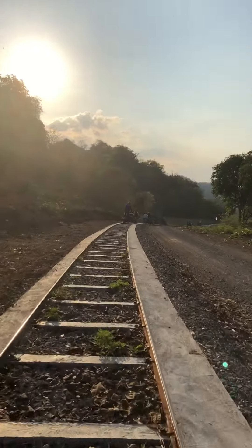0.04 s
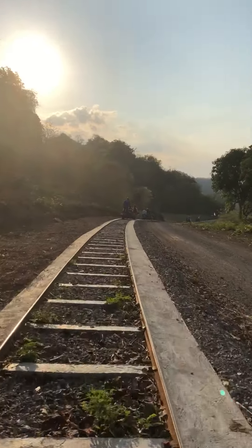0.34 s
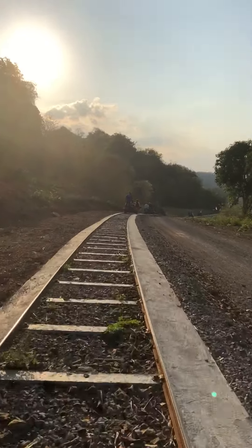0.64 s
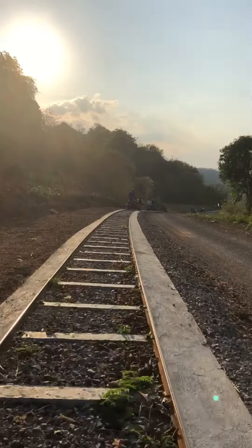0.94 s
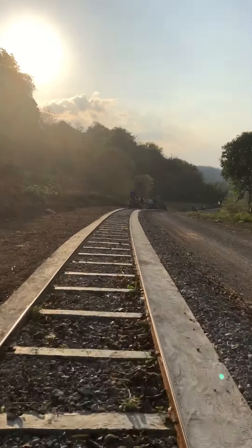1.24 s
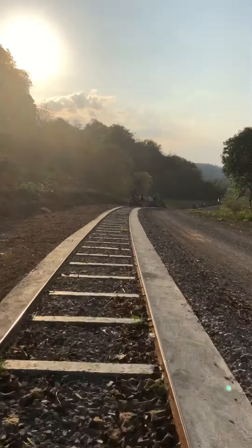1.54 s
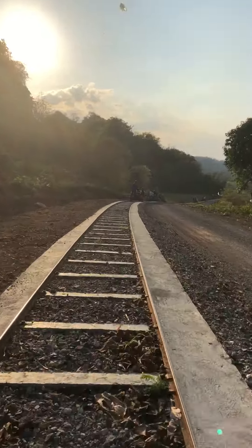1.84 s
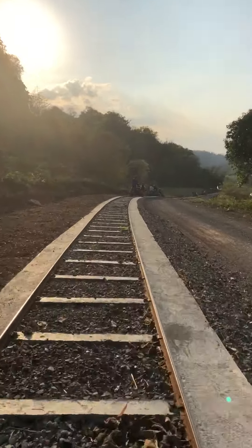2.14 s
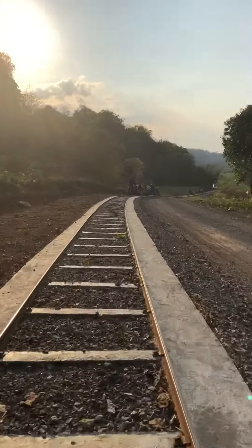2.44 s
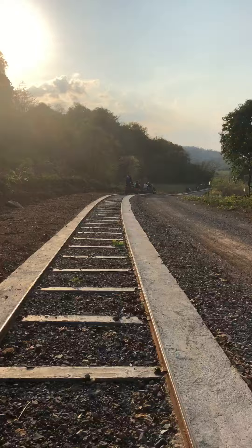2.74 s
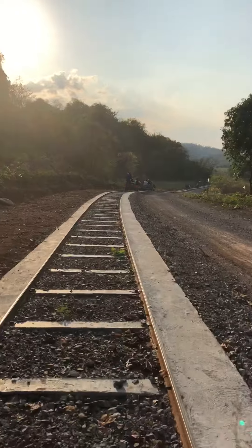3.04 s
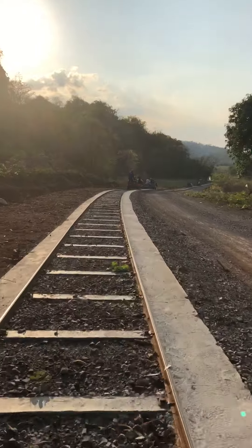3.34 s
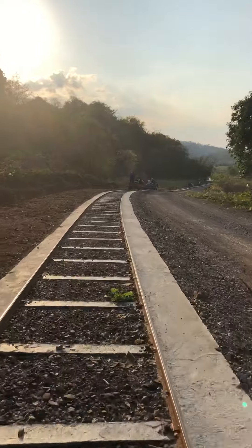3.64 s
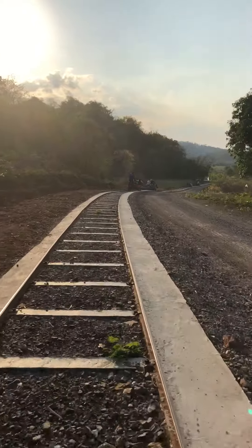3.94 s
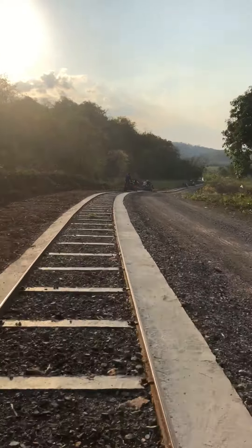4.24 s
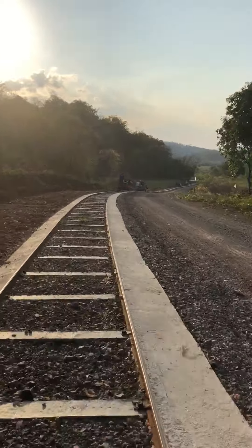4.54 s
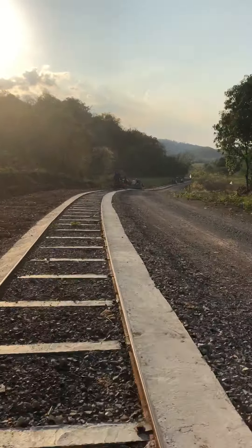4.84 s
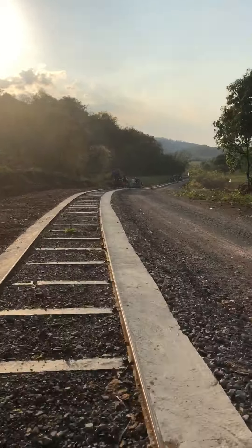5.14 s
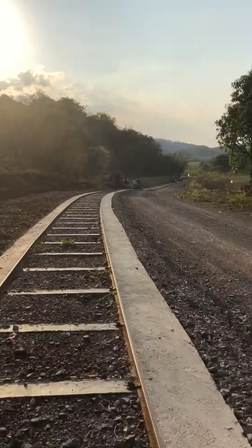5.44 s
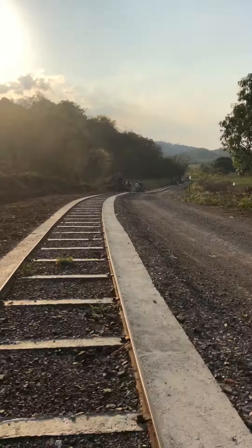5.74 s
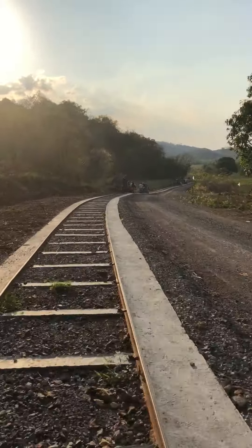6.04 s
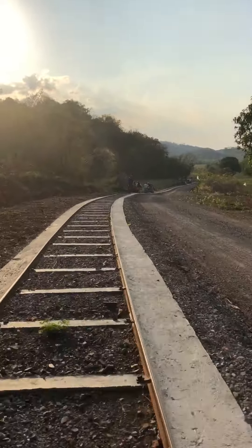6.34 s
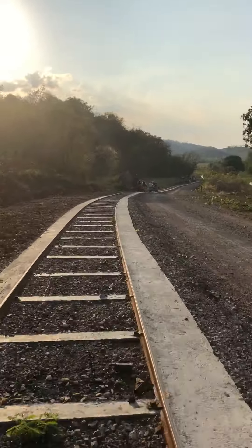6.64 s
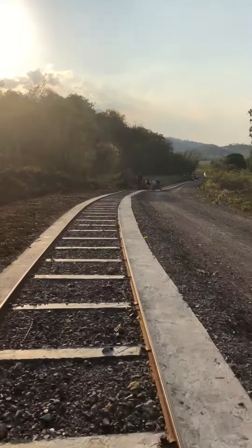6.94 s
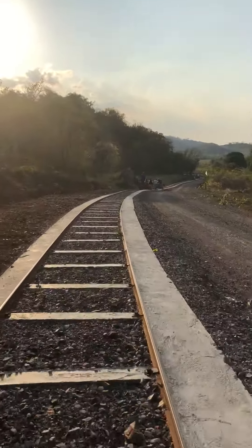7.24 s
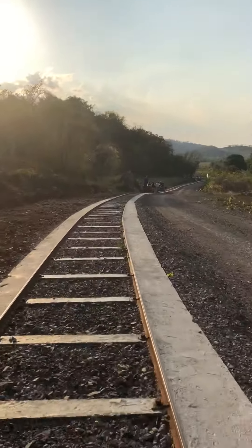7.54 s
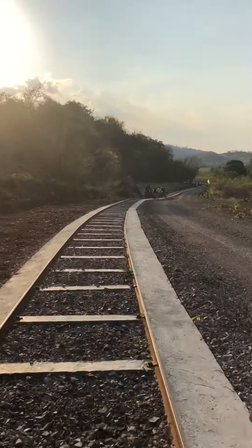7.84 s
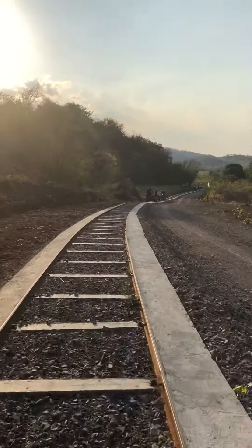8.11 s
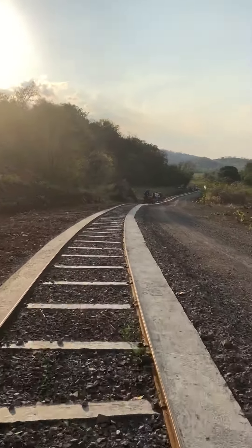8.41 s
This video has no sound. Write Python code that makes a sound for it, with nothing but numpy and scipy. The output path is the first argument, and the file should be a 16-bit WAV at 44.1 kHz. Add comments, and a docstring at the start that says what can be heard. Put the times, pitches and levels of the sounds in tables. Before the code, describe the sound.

A small motor trolley rolls along a curving narrow track in the open, heard from on board with no echo. A loud, deep deck rumble and frame rattle run from start to end, with a slow engine throbbing softly underneath. Bumps in the rail add low thumps and knocks at about 1 second, around 2.5, from 3.7 to 4.1, strongly at 5.7, and in a cluster from 6.4 to 7.3 seconds. Much quieter, a wheel scrapes the rail with a high metallic ring four to five times a second, with stray touches and sharper sizzling bites near 0.8, 4.1, 5.2 and 8.5 seconds. The wheels hiss over sand in the background, crunching briefly at each bump. A faint, thin steel whine comes and goes, and a slight hollow ring swells in the frame near 7.7 seconds.

```python
"""A loud, thumping deck rumble, heard on board a small motor trolley on an open narrow-gauge curve.
Rough rail shakes the deck and rattles the frame; bumps heave the deck, and a slow engine throbs below.
A wheel flange scrapes the rail once a turn, with stray touches and hard bites in between.
Behind it the treads hiss over sand, and now and then the steel sings with a thin whine."""
import sys
import numpy as np
from scipy import signal
from scipy.fft import rfft, irfft, next_fast_len
from scipy.io import wavfile
from scipy.ndimage import uniform_filter1d

SR = 44100
rng = np.random.default_rng(int(sys.argv[2]) if len(sys.argv) > 2 else 0)


def master_out(mix):
    """Clip the mix to full scale and print it as 16-bit PCM to the path in sys.argv[1]."""
    frames = np.transpose(np.atleast_2d(mix))
    ceiling = np.clip(frames, -1, 1)
    pcm = np.round(ceiling * 32767).astype(np.int16)
    wavfile.write(sys.argv[1], SR, pcm)


N = 377937
TIME = np.arange(N) / SR

# Resonances of deck, frame and wheel: f/Hz, nominal width/Hz, relative level/dB
BOOM_MODES = [(89, 28, -15.5), (122, 41.7, 1), (154.2, 35.7, -0.5)]
DRONE_MODES = [(234.9, 50.6, -2), (276.5, 64.2, -1), (333, 65, -10.5)]
FRAME_MODES = [(379.7, 69, -1.5), (488.4, 78.6, 0.5), (627, 124, -7), (856, 126, -8.5), (970, 73, -13.5)]
RING_MODES = [(3480, 42, 0), (3540, 45, -2.5), (4020, 65, -6)]
SIZZLE_MODES = [(9772, 70, -6), (9908, 75, -4.5), (10530, 170, -3), (10670, 120, 0), (14560, 300, -17),
                (15150, 160, -16), (15380, 150, -16)]
WHINE_MODES = [(8001, 45, 0), (8746, 80, -7), (13200, 350, -17)]
# Deck faders, before trim: t/s, boom level/dB, drone level/dB
DECK_LEVELS = [(0.1, -20, -19.5), (0.4, -20, -18.5), (1.43, -19, -17), (2.32, -17.5, -19.5),
               (2.72, -19, -19.5), (3.44, -18.5, -18), (4.33, -22.5, -20), (4.59, -19.5, -16),
               (5.39, -22, -16.5), (5.6, -19, -17.5), (5.97, -20.5, -18.5), (6.53, -21.5, -17),
               (7.8, -18.5, -19.5), (8.5, -20, -18)]
# Rail roughness as faders, before trim: t/s, frame rattle level/dB, tread hiss level/dB
RAIL_ROUGHNESS = [(0.1, -26, -42), (0.87, -26, -43.5), (4.5, -26, -44.5), (4.85, -26, -43.5),
                  (5.67, -26.5, -43.5), (6.79, -23.5, -42.5), (8.31, -24, -43.5), (8.5, -22.5, -42.5)]
# Big bumps in the rail: t/s, thump peak level/dB, thump f/Hz, knock drive level/dB
BIG_BUMPS = [(0.857, -7, 104, -26), (1.004, -5, 131, -24), (2.404, -1, 137, -28), (2.629, -5, 292, -15),
             (3.703, -4.5, 247, -19), (4.02, -5, 267, -25), (4.081, -3, 154, -14), (5.722, 0.5, 140, -17),
             (6.389, -5.5, 271, -16), (6.633, -5, 250, -12.5), (7.041, -5, 124, -18),
             (7.24, -4.5, 207, -20), (7.322, -2.5, 100, -7)]
# Engine speed: t/s, firing f/Hz
FIRING_RATE = [(0, 14.2), (.7, 14.2), (1.5, 14.03), (3.3, 14.1), (3.8, 14.35), (4.5, 14), (5.3, 13.95),
               (6, 14.15), (7.1, 13.8), (8.57, 14.15)]
# Engine partials: multiple of the firing rate, rms level/dB
ENGINE_ORDERS = [(3, -44), (4, -37), (5, -35.5), (6, -42), (7, -36.5), (8, -45.5), (9, -32.5), (10, -31),
                 (11, -45.5)]
# Swells of the frame's hollow ring: t/s, level/dB
HOLLOW_SWELLS = [(0, -46), (1.5, -42), (3.3, -49.5), (6.8, -47), (7.7, -36.5), (8.57, -40)]
# Wheel speed: t/s, turning f/Hz
WHEEL_SPEED = [(0, 4.284), (1.3, 4.595), (2.5, 4.593), (3.1, 4.158), (4.2, 4.423), (5.2, 4.447),
               (8.57, 4.739)]
# How the flange leans on the rail: t/s, ring level/dB, touch length/s
FLANGE_LEAN = [(0, -38.5, .04), (.3, -45.5, 0.052), (.7, -39, 0.088), (1, -46, 0.069), (1.8, -38.5, .05),
               (2.1, -42, .04), (2.65, -42, 0.055), (3, -50.5, 0.055), (3.6, -38, .022), (4.3, -44, .018),
               (4.55, -45.5, .04), (5, -43, 0.042), (5.43, -54.5, .03), (5.7, -40, 0.037),
               (6.15, -41, 0.058), (6.9, -56, .07), (7.2, -41.5, 0.054), (8.57, -41.5, 0.025)]
# Jolts throw the flange against the rail: t/s, length/s, ring level/dB, sizzle level/dB
FLANGE_BITES = [(0.797, 0.081, -37, -47), (1.023, 0.012, -37, -68), (1.157, 0.027, -43, -51),
                (1.216, .056, -41, -58), (1.405, 0.061, -43, -54), (1.803, 0.035, -53, -54.5),
                (3.424, 0.051, -48, -54.5), (4.078, 0.054, -43, -46.5), (4.304, .009, -56, -44.5),
                (5.206, 0.042, -42, -48.5), (5.74, .024, -39, -59), (6.47, 0.074, -54, -57),
                (6.76, 0.086, -44, -60), (8.48, 0.057, -43, -46.5)]
# Tone of the grit under the treads: f/Hz, relative level/dB
GRIT_EQ = [(500, 2), (1100, 0), (1500, -1.5), (2100, -5), (3200, -6.5), (4600, -15), (7200, -19.5),
           (9000, -26), (12000, -28.5), (15500, -33)]
# Swells of the wheel's whine: t/s, length/s, level/dB
WHINE_SWELLS = [(.05, 0.17, -65), (.21, .03, -51), (1.43, 0.067, -59), (5.58, 0.14, -59),
                (6.235, 0.082, -56), (7.2, 0.41, -69), (8.42, 0.067, -50)]


def rumble(boom_db, drone_db, frame_db, deck_trim_db=2.0, frame_trim_db=-1.68):
    """Rough rail drives the deck and the stiffer frame; rougher stretches make boom and rattle surge."""
    surge_db = .7 * drift(9)
    boom = from_db(boom_db + deck_trim_db + surge_db) * evened(shaken(BOOM_MODES, 1), span_s=.2)
    drone = from_db(drone_db + deck_trim_db) * evened(shaken(DRONE_MODES, 1), span_s=.25)
    flutter = from_db(1.95 * drift(60))
    rattle = evened(shaken(FRAME_MODES, flutter), span_s=.28)
    return boom + drone + from_db(frame_db + frame_trim_db + surge_db) * rattle


def thumps(bumps, width_hz=60, contact_hz=600):
    """Each bump heaves the deck for a few cycles and knocks the frame."""
    out, knocks = np.zeros(N), np.zeros(N)
    click = signal.unit_impulse(SR // 5)
    for s, peak_db, hz, knock_db in bumps:
        heave = resonate_twice(click, hz, width_hz)
        at = int(s * SR)
        out[at:at + len(click)] += (from_db(peak_db) * heave / np.abs(heave).max())[:N - at]
        knocks[at] = from_db(knock_db)
    # a heavy wheel lands softly, so the upper modes hardly speak
    knocks = signal.sosfilt(signal.butter(2, contact_hz, fs=SR, output="sos"), knocks + 1e-18)
    for k, (hz, mode_width_hz, mode_db) in enumerate(FRAME_MODES):
        ring_width_hz = mode_width_hz / 2
        strength = from_db(mode_db) * SR / (2 * np.pi * ring_width_hz)
        ring = resonate(knocks, hz, ring_width_hz)
        out += (-1) ** k * strength * resonate(ring, hz, width_hz=500)
    return out


def small_bumps(per_s=.8, peak_db=-12.5, knock_db=-25):
    """Light bumps at random times, pitched between boom and drone: rows as in BIG_BUMPS."""
    draws = rng.random((int(per_s * N / SR), 2))
    low_hz, high_hz = BOOM_MODES[1][0], DRONE_MODES[1][0]
    return [(when * TIME[-1], peak_db, low_hz * (high_hz / low_hz) ** pitch, knock_db)
            for when, pitch in draws]


def engine(first_firing_s=.00823, waver_db_per_order=.4715):
    """Low multiples of the firing rate add up to a soft throb; the higher ones waver more."""
    firings = cycles(FIRING_RATE, first_firing_s)
    throb = np.zeros(N)
    for order, level_db in ENGINE_ORDERS:
        gain = from_db(level_db + waver_db_per_order * order * drift(5))
        throb += gain * np.cos(2 * np.pi * order * firings)
    return np.sqrt(2) * throb


def hollow_ring(hz=905, width_hz=76):
    """One frame resonance swells out of the rattle as a hollow ring."""
    return shaken([(hz, width_hz, 0)], from_db(in_time(HOLLOW_SWELLS)[0]))


def flange(usual_ring_db=-41, usual_sizzle_db=-53, sizzle_growth=1.2, sizzle_spread_db=1.5):
    """The flange sticks and slips on the rail: the high wheel modes speak first, the low ones hold on."""
    scrapes = list(FLANGE_BITES)
    for s, length, ring_db in turn_touches() + stray_touches():
        sizzle_db = usual_sizzle_db + sizzle_growth * (ring_db - usual_ring_db)
        scrapes.append((s, length, ring_db, sizzle_db + sizzle_spread_db * rng.standard_normal()))
    ring_force = contacts([(s, length, db) for s, length, db, _ in scrapes],
                          rise_s=.0055, fall_s=.013, sag_db=1.5)
    sizzle_force = contacts([(s, length, db) for s, length, _, db in scrapes],
                            rise_s=.0019, fall_s=.0092, sag_db=10.5)
    slips = from_db(1.63 * drift(110))
    # between touches the flange still brushes the rail, loosely following the lean
    lean_db = in_time(FLANGE_LEAN)[0] - usual_ring_db
    graze = from_db(2.7 * drift(18) + .22 * lean_db)
    ring = evened(shaken(RING_MODES, 1), span_s=.033) * (ring_force + from_db(-55) * graze) * slips
    sizzle = shaken(SIZZLE_MODES, (sizzle_force + from_db(-71.5) * graze) * slips)
    rasp = rms_one(resonate_twice(rng.standard_normal(N), hz=5550, width_hz=3500))
    return ring + sizzle + from_db(-4.5) * rasp * sizzle_force * slips


def turn_touches(first_touch_s=.016, spread_db=1.0):
    """The wheel runs out of true, so its flange meets the rail once a turn: t/s, length/s, level/dB."""
    turns = cycles(WHEEL_SPEED, first_touch_s)
    at = np.searchsorted(turns, np.arange(turns[-1]))
    ring_db, length_s = in_time(FLANGE_LEAN)
    return list(zip(TIME[at], length_s[at], ring_db[at] + spread_db * rng.standard_normal(len(at))))


def stray_touches(per_s=3.5, mean_length_s=.032, level_db=-52, spread_db=2.5):
    """The flange chatters lightly against the rail at random: t/s, length/s, level/dB."""
    draws = rng.random((int(per_s * N / SR), 3))
    return [(when * TIME[-1], mean_length_s * (.5 + length), level_db + spread_db * (2 * size - 1))
            for when, length, size in draws]


def grit(hiss_db, bumps, trim_db=4.0, sand_db=-7.0, crunch_db=-1.0):
    """The treads hiss on the rail and crush sand, with a short crunch as they land at each bump."""
    hiss = coloured(rng.standard_normal(N) + from_db(sand_db) * sand(), GRIT_EQ)
    landings = [(s, .02, peak_db + crunch_db) for s, peak_db, _, _ in bumps]
    crunch = contacts(landings, rise_s=.004, fall_s=.018, sag_db=3.0)
    return hiss * from_db(hiss_db + trim_db + drift(35)) * (1 + crunch)


def sand(bands=18, grains_per_band_per_s=50, size_db=2.0, width_hz=550):
    """Each crushed grain is a tiny ping in one of many pitch bands; rms 1."""
    out = 0
    for hz in np.geomspace(1400, 14500, bands):
        at = rng.integers(0, N, int(grains_per_band_per_s * N / SR))
        polarity = rng.choice([-1, 1], len(at))
        sizes = np.minimum(rng.exponential(1, len(at)), 4)
        clicks = np.zeros(N)
        clicks[at] = polarity * from_db(size_db * sizes)
        out = out + np.sqrt(hz) * resonate_twice(clicks, hz, width_hz)
    return rms_one(out)


def whine(floor_db=-71.5):
    """The wheel creeps sideways in the curve and sings thinly; each mode wavers on its own."""
    force = contacts(WHINE_SWELLS, rise_s=.011, fall_s=.01, sag_db=8.0) + from_db(floor_db)
    return sum(shaken([(hz, width_hz, 0)], force * from_db(level_db + 3 * drift(25)))
               for hz, width_hz, level_db in WHINE_MODES)


def shaken(modes, force):
    """Random contact forces drive each mode; the overall rms matches that of the force."""
    out = 0
    for hz, width_hz, level_db in modes:
        push = force * rng.standard_normal(N)
        out = out + from_db(level_db) * rms_one(resonate_twice(push, hz, width_hz * np.sqrt(2)))
    return rms_one(out) * np.sqrt(np.mean(np.square(force)))


def contacts(rows, rise_s, fall_s, sag_db):
    """A rubbing envelope that bites, sags and lets go, from rows of t/s, length/s, mid-touch level/dB."""
    force = np.zeros(N)
    for s, length, level_db in rows:
        at = max(int(s * SR), 0)
        t = TIME[:min(int((length + 8 * fall_s) * SR), N - at)]
        attack = 1 - np.exp(-t / rise_s)
        hold = from_db(level_db + sag_db * (.5 - np.minimum(t / length, 1)))
        release = np.exp(-np.maximum(t - length, 0) / fall_s)
        force[at:at + len(t)] += attack * hold * release
    return force


def resonate(x, hz, width_hz):
    """A two-pole resonance with gain 1 at its peak."""
    r = np.exp(-np.pi * width_hz / SR)
    feedback = [1, -2 * r * np.cos(2 * np.pi * hz / SR), r * r]
    return signal.lfilter(np.array([1, 0, -1]) * (1 - r * r) / 2, feedback, x + 1e-18)


def resonate_twice(x, hz, width_hz):
    """Two resonances in series, for steep skirts."""
    return resonate(resonate(x, hz, width_hz), hz, width_hz)


def evened(x, span_s):
    """Ride the gain to hold a noise steady over the given span."""
    return x / np.sqrt(uniform_filter1d(x * x, int(span_s * SR)) + 1e-12)


def coloured(x, eq):
    """Shape x with a smooth EQ curve; rms 1."""
    hz, level_db = np.transpose(eq)
    size = next_fast_len(N)
    log_hz = np.log(np.arange(size // 2 + 1) * SR / size + 1)
    gain = from_db(np.interp(log_hz, np.log(hz), level_db))
    return rms_one(irfft(rfft(x, size) * gain, size)[:N])


def drift(per_s):
    """A random modulator gliding between per_s values a second; rms 1."""
    knots = rng.standard_normal(int(N / SR * per_s) + 2)
    return rms_one(np.interp(TIME * per_s, np.arange(len(knots)), knots))


def cycles(speed, first_s):
    """Cycles counted from first_s along a curve of t/s, f/Hz."""
    return np.cumsum(in_time(speed)[0]) / SR - first_s * speed[0][1]


def in_time(rows):
    """Each column of an automation curve at every sample."""
    s, *columns = np.transpose(rows)
    return [np.interp(TIME, s, column) for column in columns]


def from_db(db):
    """Decibels to gain."""
    return 10 ** (np.asarray(db) / 20)


def rms_one(x):
    """Scale to rms 1."""
    return x / np.sqrt(np.mean(x ** 2) + 1e-20)


def scene():
    """A dry mono mix: every source rides with the listener, with no walls near."""
    boom_db, drone_db = in_time(DECK_LEVELS)
    frame_db, hiss_db = in_time(RAIL_ROUGHNESS)
    bumps = list(BIG_BUMPS) + small_bumps()
    body = rumble(boom_db, drone_db, frame_db) + thumps(bumps) + engine() + hollow_ring()
    wheels = flange() + grit(hiss_db, bumps) + whine()
    return (body + wheels)[None]


def record(dry, low_cut_hz=42, high_cut_hz=15720):
    """Roll off the deep bass, round the highest peaks and cut the top steeply."""
    x = signal.sosfilt(signal.butter(2, low_cut_hz, "high", fs=SR, output="sos"), dry)
    x = x / (1 + x ** 8) ** (1 / 8)
    return signal.sosfilt(signal.ellip(12, .1, 80, high_cut_hz, fs=SR, output="sos"), x)


dry = scene()
out = record(dry)
master_out(out)
```